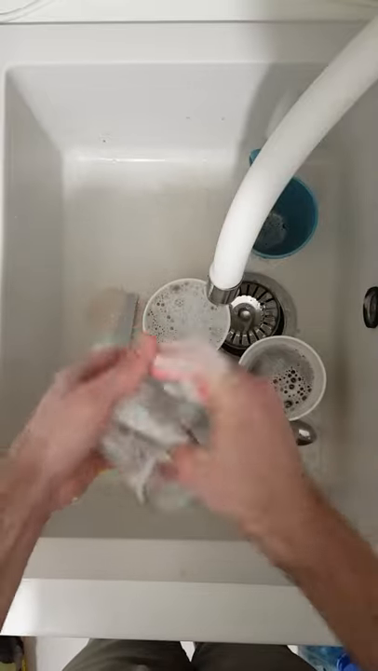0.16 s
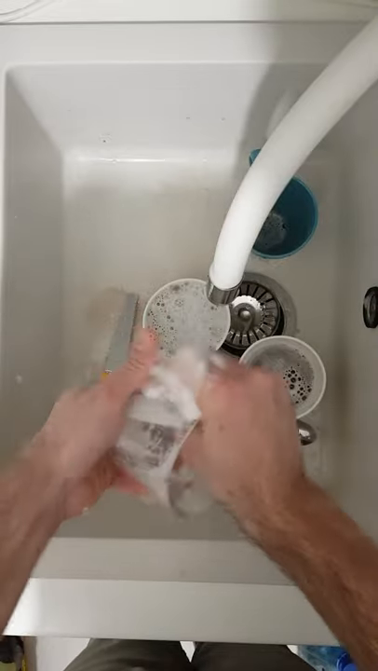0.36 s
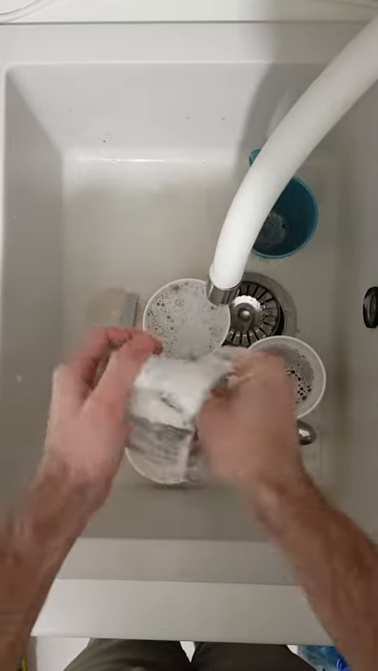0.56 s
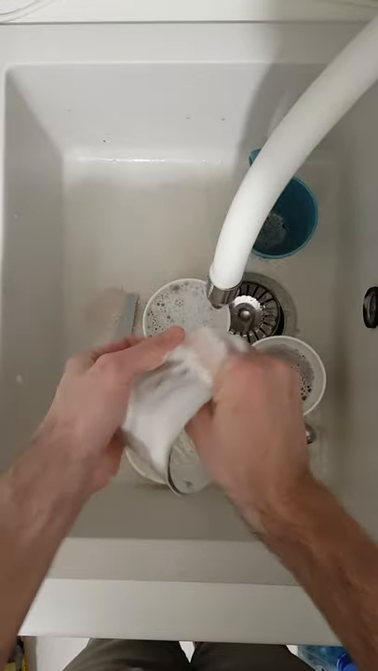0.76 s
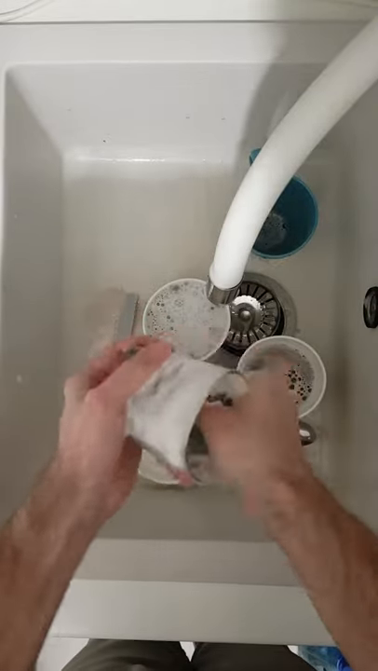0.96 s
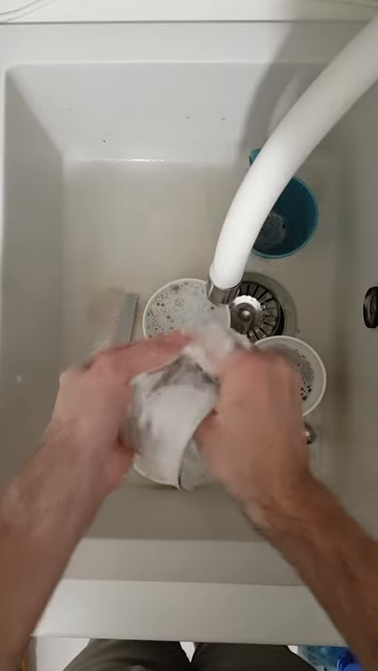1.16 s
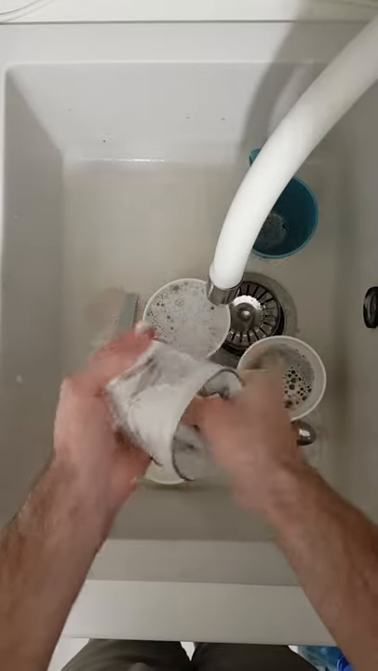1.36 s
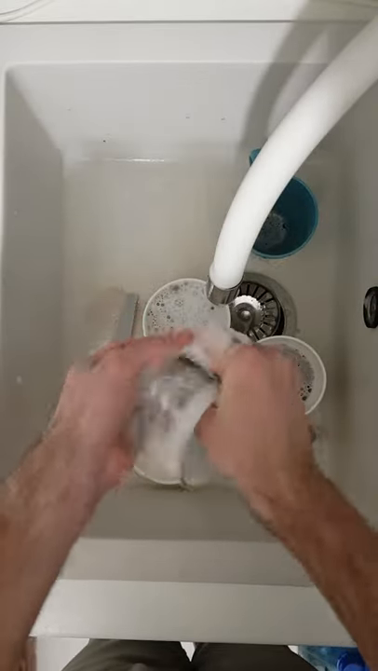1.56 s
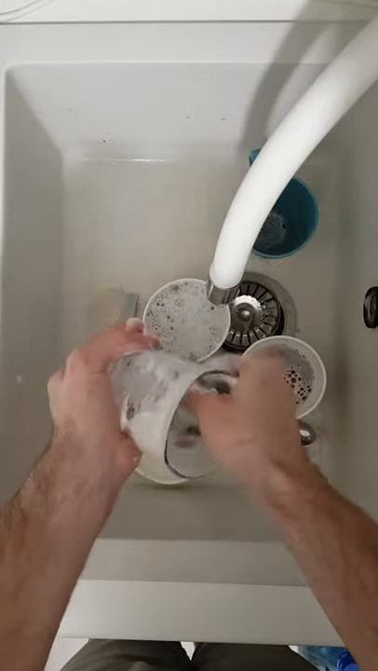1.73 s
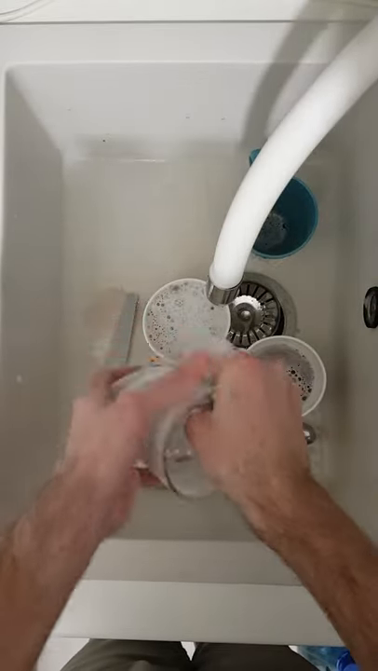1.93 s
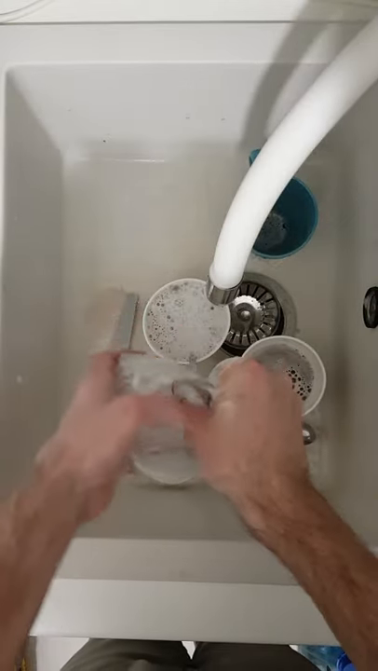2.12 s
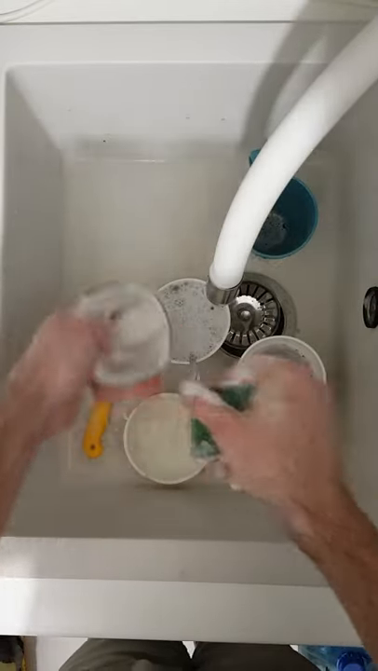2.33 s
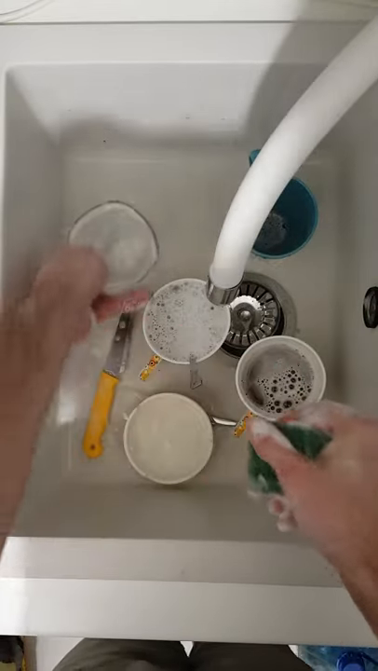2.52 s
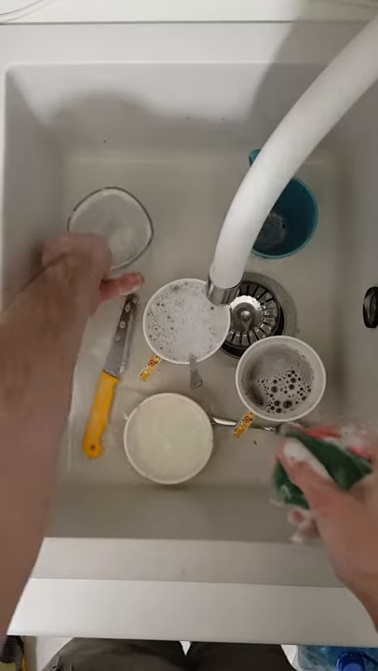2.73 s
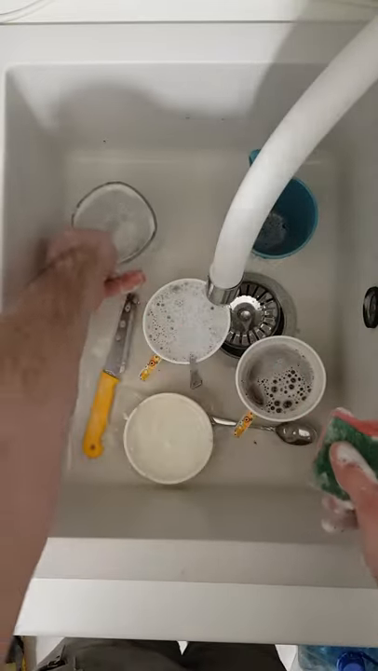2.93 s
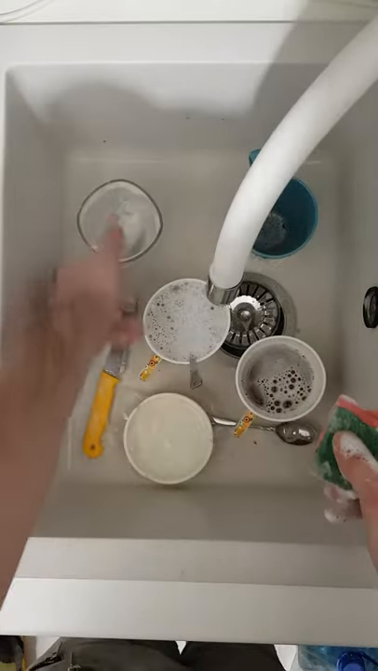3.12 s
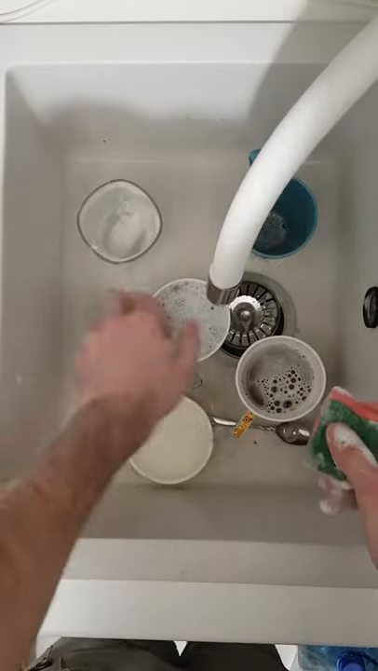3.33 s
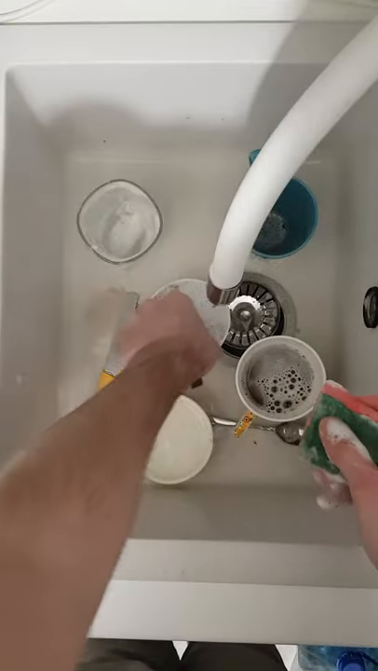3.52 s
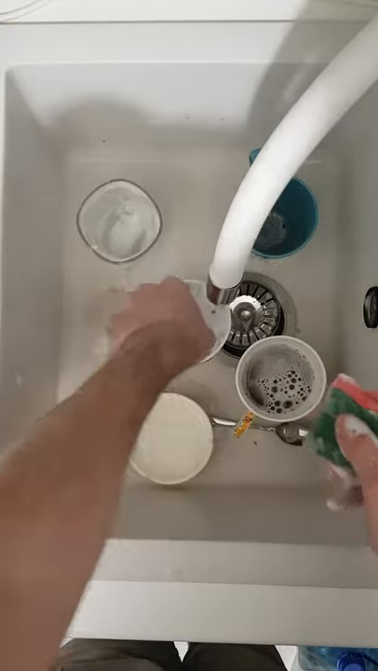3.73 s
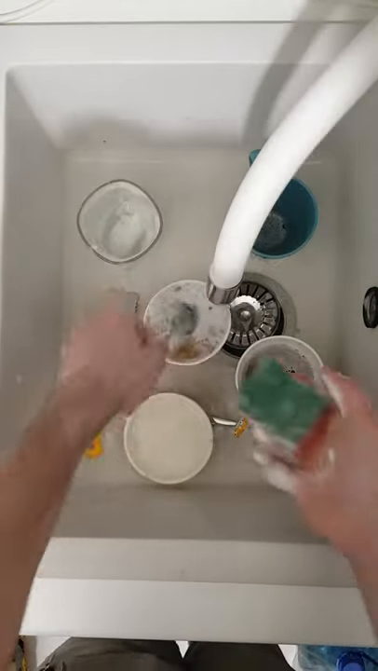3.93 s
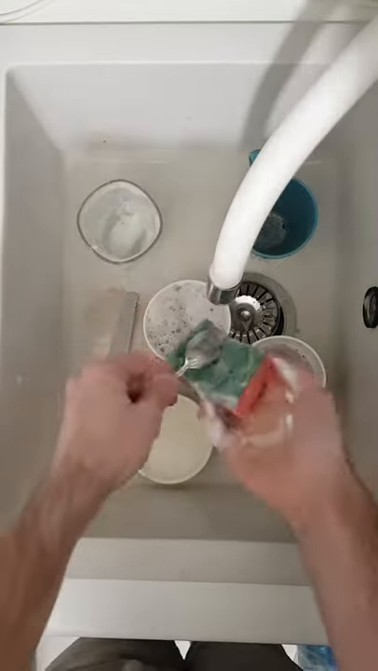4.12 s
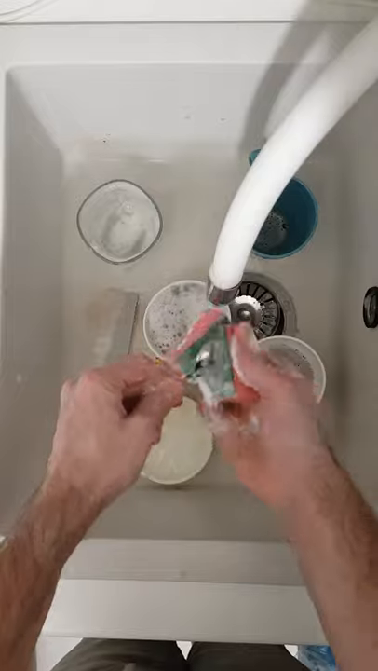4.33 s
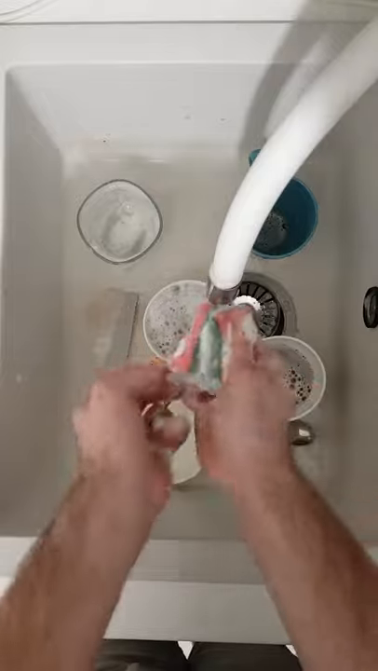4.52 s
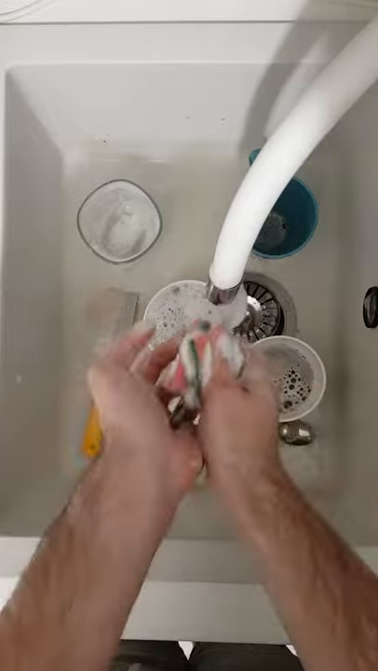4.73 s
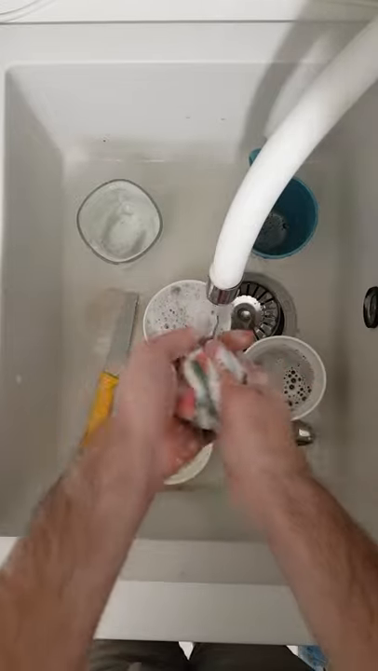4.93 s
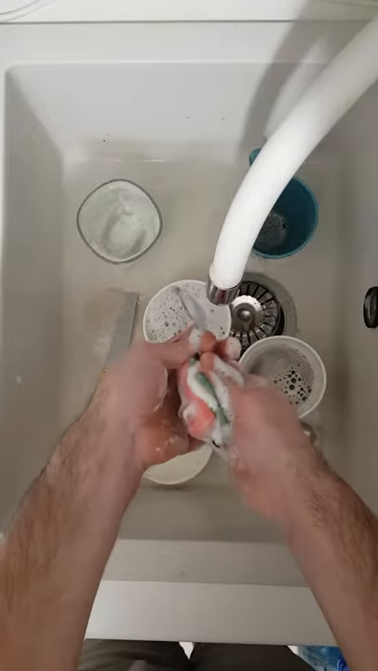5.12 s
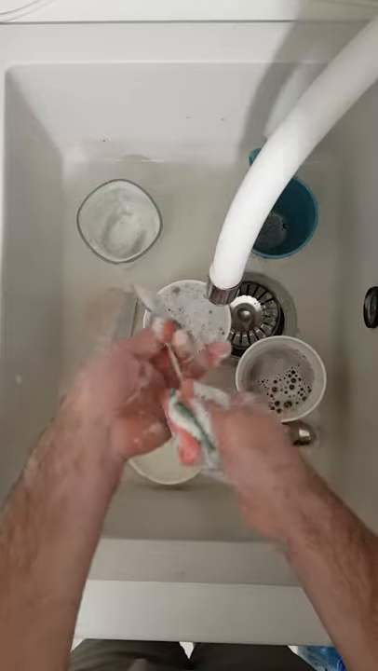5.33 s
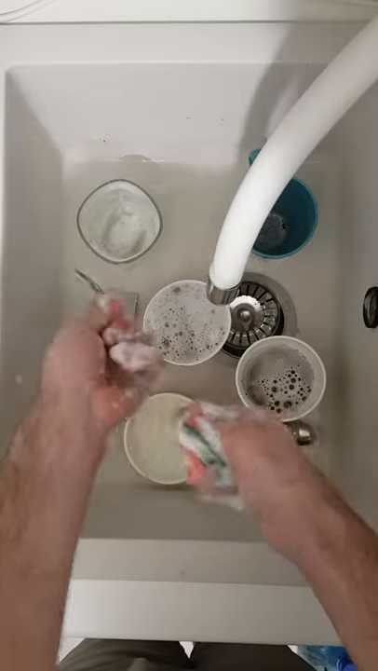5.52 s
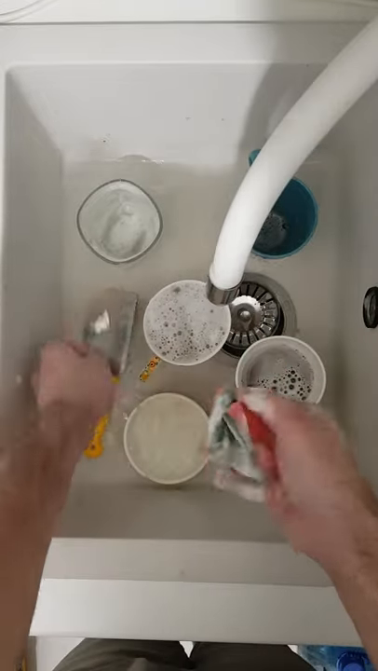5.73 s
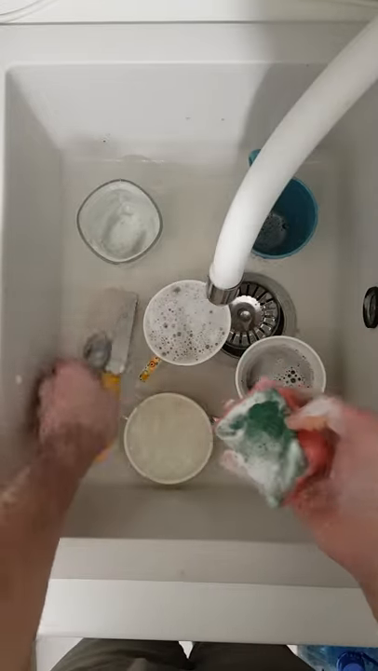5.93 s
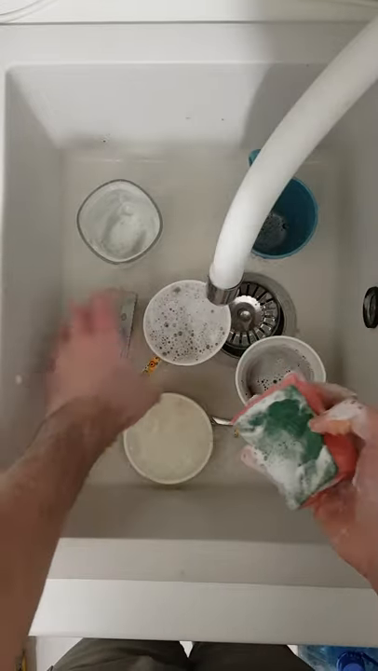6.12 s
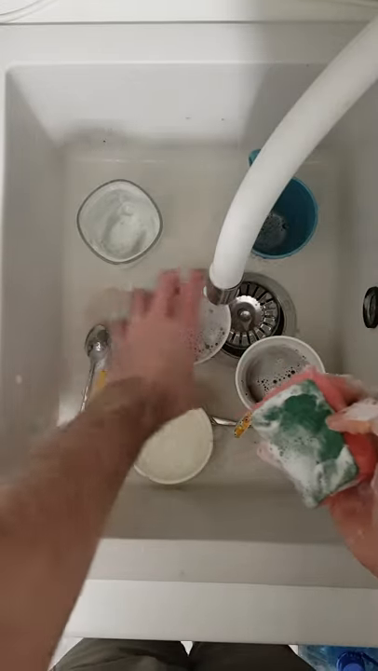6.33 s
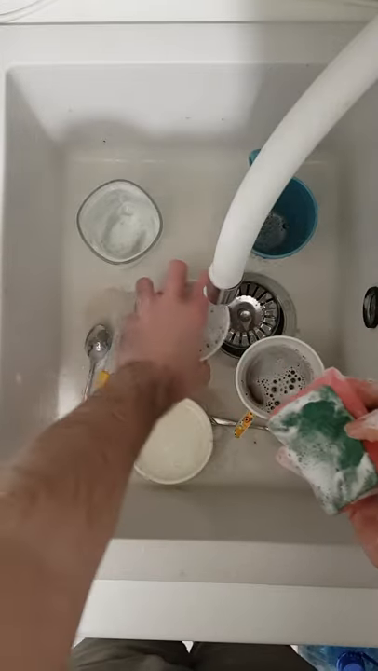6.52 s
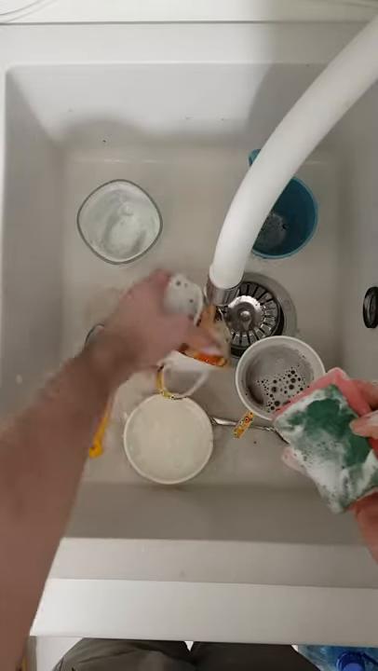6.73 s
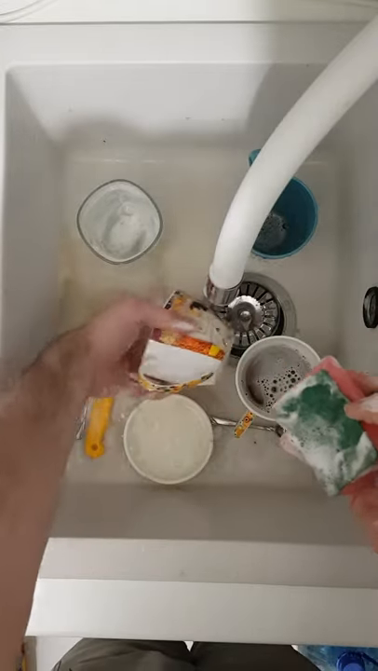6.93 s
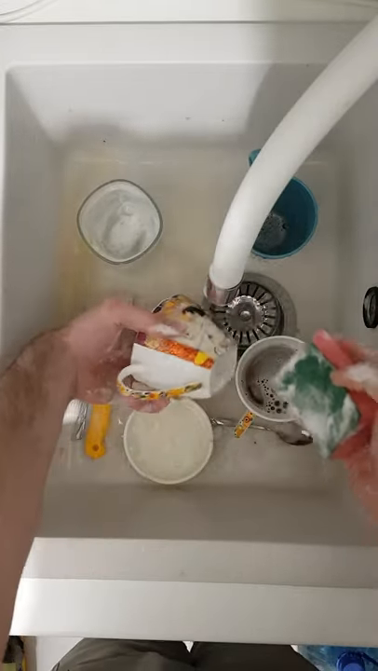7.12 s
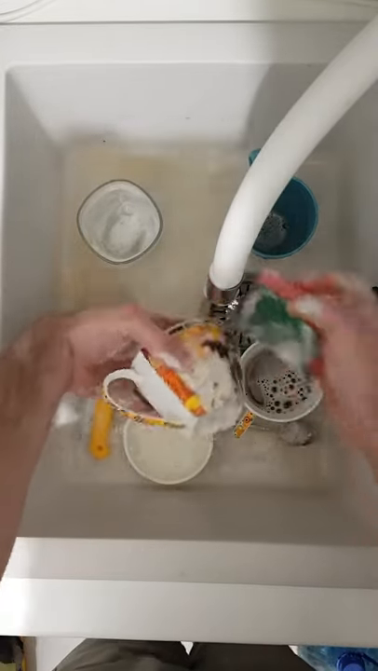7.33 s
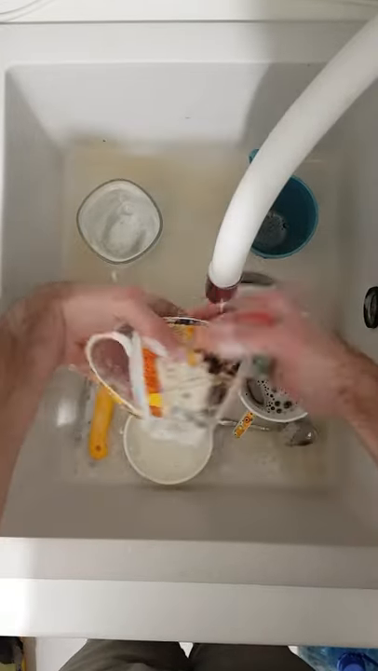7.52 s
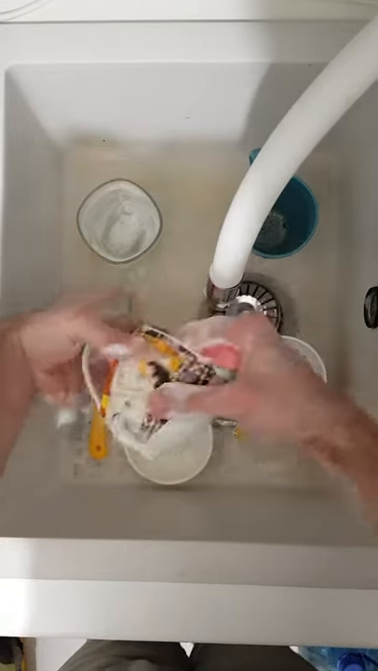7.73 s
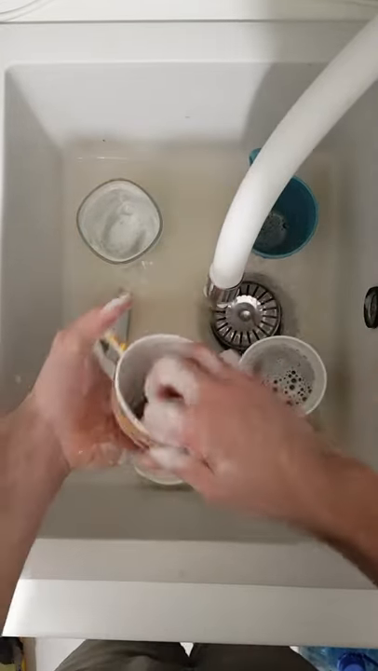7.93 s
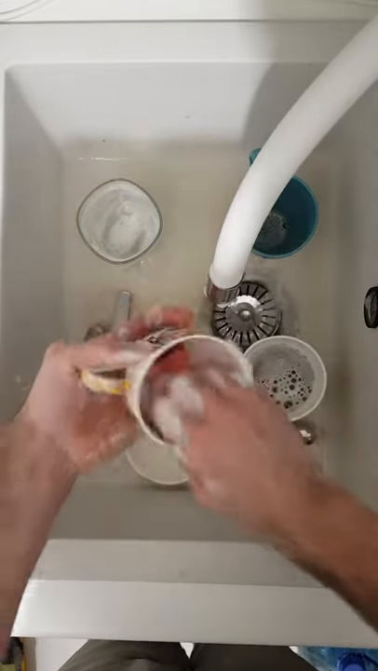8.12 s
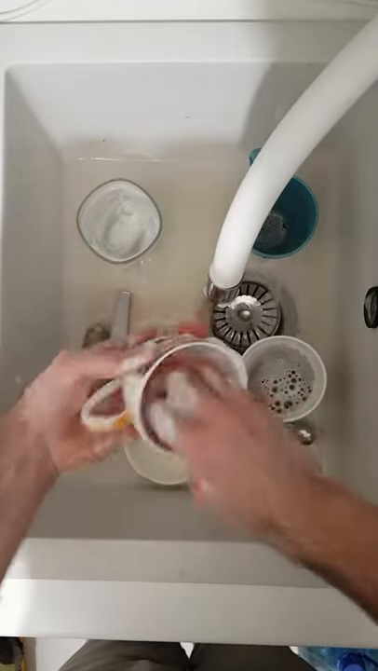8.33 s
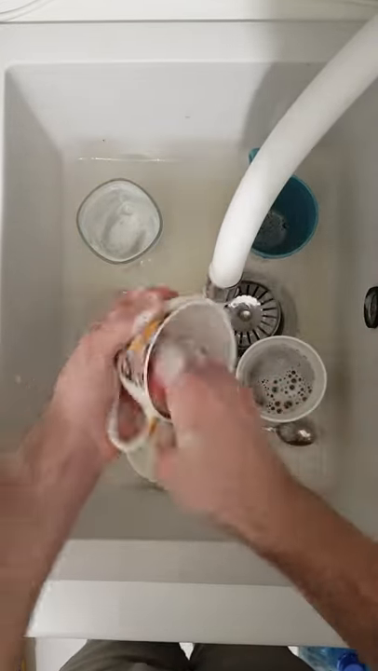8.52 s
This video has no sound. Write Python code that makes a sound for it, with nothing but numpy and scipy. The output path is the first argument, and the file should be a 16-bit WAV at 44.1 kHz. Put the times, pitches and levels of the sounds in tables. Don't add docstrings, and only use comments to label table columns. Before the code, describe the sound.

A soapy sponge squeaks and fizzes over a glass, the glass thuds into a sink, a spoon clatters, then a mug is emptied and wiped.

```python
import sys
import numpy as np
from scipy import signal
from scipy.fft import rfft, irfft, next_fast_len
from scipy.io import wavfile
from scipy.ndimage import uniform_filter1d

SR = 44100
rng = np.random.default_rng(int(sys.argv[2]) if len(sys.argv) > 2 else 0)


def wrap_up_sound(samples):
    columns = np.atleast_2d(samples).T
    tamed = np.clip(columns, -1, 1)
    steps = np.round(tamed * 32767).astype(np.int16)
    wavfile.write(sys.argv[1], SR, steps)


def gain_from_db(level_db):
    decades = np.asarray(level_db, float) / 20
    return 10 ** decades


N = 377496
STEP = 40

# (frequency [Hz], level [dB per Hz])
MUG_BURST = [(60, -47), (250, -29.5), (600, -4), (1200, 1.5), (2200, -12), (2700, -6.5), (6000, -29),
             (9000, -30.5), (16000, -38.5)]


def rms_one(x):
    return x / np.sqrt(np.mean(x ** 2) + 1e-20)


def at_hz(points, hz):
    table = np.array(points)
    return np.interp(np.log(np.maximum(hz, 1)), np.log(table[:, 0]), table[:, 1])


def over_time(points):
    return np.interp(np.arange(N) / SR, *np.transpose(points))


def every_sample(slow):
    between = np.arange(STEP) / STEP
    return (slow[:-1, None] + np.diff(slow)[:, None] * between).ravel()[:N]


def colour(x, spectrum):
    size = next_fast_len(N)
    hz = np.fft.rfftfreq(size, 1 / SR)
    inside = (hz > spectrum[0][0]) & (hz < spectrum[-1][0])
    return irfft(rfft(x, size) * gain_from_db(at_hz(spectrum, hz)) * inside, size)[:, :N]


def drift(rate_hz):
    r = np.exp(-2 * STEP * np.pi * rate_hz / SR)
    white = rng.standard_normal(N // STEP + 2002)
    return rms_one(signal.lfilter([1], [1, -2 * r, r * r], white)[2000:])


def ring(force, hz, t60):
    r = gain_from_db(-60 / (t60 * SR))
    w = 2 * np.pi * hz / SR
    return signal.lfilter([0, np.sin(w)], [1, -2 * r * np.cos(w), r * r], force + 1e-18)


def grains(per_s, uneven_db, clump_db):
    sizes = gain_from_db(uneven_db * np.minimum(rng.exponential(1, (2, N)), 5))
    sizes = sizes * np.sign(rng.random((2, N)) - .5)
    chance = per_s * every_sample(gain_from_db(clump_db * drift(25))) / SR
    return sizes * (rng.random((2, N)) < chance)


def pockets(clicks, low_hz, high_hz, cycles, centre_hz, octaves, wander_db, count):
    dealt = rng.integers(0, count, N)
    sizes = np.geomspace(low_hz, high_hz, count)
    gains = []
    for hz in sizes:
        off_centre = np.log2(hz / centre_hz) / octaves
        gains.append(gain_from_db(wander_db * drift(9.0) - 5.1 * off_centre ** 2) + 0.027)
    gains = np.array(gains)
    gains /= np.sqrt(np.sum(gains ** 2, axis=0))
    out = 0
    for k, hz in enumerate(sizes):
        out = out + every_sample(gains[k]) * rms_one(ring(clicks * (dealt == k), hz, cycles / hz))
    return signal.sosfilt(signal.butter(2, 1.076 * low_hz, "high", fs=SR, output="sos"), out)


def gestures(s, rise_s, fall_s, db):
    t = np.arange(N // STEP + 2) * STEP / SR - s[:, None]
    swell = np.maximum(-t, 0) / np.abs(rise_s)[:, None]
    fade = np.maximum(t, 0) / np.abs(fall_s)[:, None]
    return gain_from_db(2 * (db[:, None] - 10 * swell ** 1.7 - 10 * fade ** 1.19)) + 1e-17


def kitchen_floor():
    # (frequency [Hz], level [dB per Hz])
    floor_colour = [(15, -54), (25, -17.5), (76, -6), (180, -21), (270, -12), (350, -14.5), (480, -8.5),
                    (936, -30.5), (1560, -9.5), (2910, -35), (4740, -29.5), (16000, -11)]
    return gain_from_db(-73) * rms_one(colour(rng.standard_normal((2, N)), floor_colour))


def foam_fizz():
    # (frequency [Hz], level [dB per Hz])
    fizz_colour = [(1470, -14), (2500, -4), (2790, -9), (3040, -4.5), (7300, -9), (8080, -13),
                   (11800, -11.5), (15200, -22.5), (16000, -18.5)]
    flicker = every_sample(gain_from_db(1.2 * drift(30)))
    return flicker * rms_one(colour(grains(per_s=9000, uneven_db=0.0, clump_db=3.0), fizz_colour))


def sponge_squelch():
    # (time [s], frequency [Hz])
    favoured = [(0, 1630), (.7, 1630), (2.0, 1764), (4.3, 1465), (5.3, 1840), (5.8, 1700), (6.9, 1400),
                (7.1, 2130), (7.5, 1740), (8.099, 1390), (8.56, 1190)]
    centre_hz = np.interp(np.arange(N // STEP + 2) * STEP / SR, *np.transpose(favoured))
    clicks = grains(per_s=5000, uneven_db=-2.0, clump_db=3.0)
    return pockets(clicks, low_hz=943, high_hz=3060, cycles=22.0, centre_hz=centre_hz,
                   octaves=0.51, wander_db=3.0, count=11)


def dish_hollow(centre_hz):
    clicks = grains(per_s=1800, uneven_db=2.0, clump_db=2.5)
    return pockets(clicks, low_hz=242, high_hz=900, cycles=21.0, centre_hz=centre_hz,
                   octaves=0.24, wander_db=4.0, count=12)


def body_rumble():
    # (frequency [Hz], level [dB per Hz])
    rumble_colour = [(12, -44), (20, -7), (34, -5), (54, 3.5), (113, -1.5), (189, -23), (265, -11),
                     (300, -19), (390, -39), (660, -120)]
    return rms_one(colour(rng.standard_normal((2, N)), rumble_colour))


def handling():
    # (time [s], rise [s], fall [s], foam level [dB], squelch above foam [dB])
    glass_strokes = [(.05, 0.089, 0.66, -66, -2), (.16, .016, 0.068, -48.5, -0.5),
                     (.215, 0.052, 0.068, -50, -2), (.29, 0.022, 0.16, -48.5, 0.5),
                     (.539, 0.11, 0.034, -48.5, 2), (.632, 0.048, 0.056, -53, 4),
                     (.754, 0.067, 0.21, -65, -5), (.85, 0.072, 0.079, -52.5, 0.5),
                     (.93, 0.031, 0.086, -48, 6), (1.155, 0.13, 0.3, -61, -2),
                     (1.27, 0.075, 0.041, -54.5, -1), (1.375, 0.1, 0.046, -48.5, 1),
                     (1.511, 0.059, 0.043, -54, 1), (1.64, 0.066, 0.087, -53.5, -7),
                     (1.715, 0.073, 0.061, -55.5, 3), (1.839, 0.036, 0.084, -59, -2.5),
                     (2.1, 0.098, 0.28, -68.5, 9), (2.341, 0.26, 0.043, -60, -5.5),
                     (2.735, 0.22, 0.12, -64, 3), (2.86, 0.027, 0.016, -62.5, -7)]
    spoon_strokes = [(3.576, 0.02, 0.073, -61.5, 17.5), (3.76, 0.05, 0.094, -68, -4),
                     (4.2, 0.05, 0.22, -60.5, -19.5), (4.326, 0.048, 0.23, -56, -7),
                     (4.416, 0.067, 0.064, -45.5, 7.5), (4.652, 0.08, 0.32, -65.5, 14),
                     (4.814, 0.8, 0.077, -59, 12.5), (5.1, 0.098, 0.11, -79, 16),
                     (5.27, 0.058, 0.14, -68, 20), (5.349, 0.063, 0.074, -62.5, 16.5),
                     (5.484, 0.051, 0.05, -52.5, 10.5), (5.662, 0.078, 0.12, -56, 1.5),
                     (5.96, 0.16, 0.028, -62, -4.5), (6.3, 0.087, 0.06, -64.5, -2),
                     (6.58, 0.054, 0.036, -66, 20)]
    mug_strokes = [(6.815, 0.0034, 0.26, -52.5, -24), (6.91, 0.061, 0.082, -47, 3),
                   (7.086, 0.1, 0.23, -46.5, -3), (7.172, 0.15, 0.063, -46.5, 5),
                   (7.34, 0.15, 0.061, -51.5, -11), (7.486, 0.043, 0.19, -53.5, 3),
                   (7.726, 0.073, 0.049, -52.5, 6), (7.92, 0.21, 0.13, -62, 2),
                   (8.056, 0.0089, 0.38, -54.5, 4.5), (8.18, 0.18, 0.28, -61, 17),
                   (8.51, 0.13, .1, -58.5, 11), (8.54, 0.035, .1, -57.5, 21)]
    # (frequency [Hz], level above the squelch [dB])
    glass_hollow = (800, -13)
    spoon_hollow = (910, -16)
    mug_hollow = (820, -15)
    # (time [s], fall [s], rumble level [dB], hollow level [dB], hollow frequency
    # [Hz])
    shove_list = [(.01, 0.12, -76.5, -72, 770), (.2, 0.072, -62, -59, 685), (.3, 0.19, -75, -58.5, 800),
                  (0.527, .04, -46, -46, 780), (0.577, .035, -57, -52.5, 267),
                  (.678, 0.13, -59.5, -94, 587), (.96, .05, -59, -48, 626),
                  (1.166, 0.06, -61, -68.5, 252), (1.348, 0.032, -83, -56, 900),
                  (1.8, 0.035, -87, -64.5, 800), (2.595, 0.1, -62.5, -73.5, 440),
                  (2.879, .05, -45, -79, 400), (3.219, 0.14, -59.5, -85.5, 510),
                  (3.521, 0.03, -44.5, -52, 250), (3.585, .06, -48, -43.5, 390),
                  (3.73, .05, -69, -72.5, 570), (3.907, 0.046, -70, -76.5, 317),
                  (4.239, 0.035, -56.5, -65, 296), (4.417, 0.067, -94.5, -51, 698),
                  (4.598, 0.11, -78.5, -62.5, 830), (5.0, 0.063, -69, -88, 400),
                   (5.483, 0.035, -72, -56.5, 800), (5.56, 0.1, -57, -83, 292),
                   (5.85, 0.064, -62, -68.5, 270), (5.996, 0.035, -58, -40, 254),
                   (6.51, 0.058, -66, -63, 323), (6.58, 0.047, -71.5, -46.5, 265),
                   (6.908, 0.0365, -58, -45, 492), (7.176, 0.049, -85, -50.5, 595),
                   (7.4, 0.13, -65.5, -80, 300), (7.54, 0.051, -52, -52.5, 248),
                   (7.61, 0.14, -53.5, -67, 610), (7.727, 0.037, -64.5, -45.5, 745),
                   (8.071, 0.067, -81, -50, 810), (8.219, 0.21, -87, -57, 700), (8.42, 0.07, -58, -54, 700),
                   (8.547, 0.016, -49, -36, 860)]
    basin_hz, basin_t60_s, basin_db = 270, .12, -6.5
    squelch_span = 0.73

    strokes = [row + glass_hollow for row in glass_strokes]
    strokes += [row + spoon_hollow for row in spoon_strokes]
    strokes += [row + mug_hollow for row in mug_strokes]
    s, rise, fall, foam_db, wet_db, dish_hz, dish_db = np.transpose(strokes)
    foam = gestures(s, rise, fall, foam_db)
    wet = gestures(s, squelch_span * rise, squelch_span * fall, foam_db + wet_db)

    at, fade, rumble_db, boom_db, boom_hz = np.transpose(shove_list)
    shoves = gestures(at, .4 * fade, fade, boom_db)
    hums = shoves * (basin_hz / boom_hz)[:, None] ** 2
    rumbles = shoves * gain_from_db(2 * (rumble_db - boom_db))[:, None]

    booms = np.concatenate([wet * gain_from_db(2 * dish_db)[:, None], shoves])
    weight = booms ** 10
    log_hz = np.log(np.concatenate([dish_hz, boom_hz]))
    hollow_hz = np.exp(log_hz @ weight / np.sum(weight, axis=0))

    powers = foam, wet, booms, hums, rumbles
    gains = [every_sample(np.sqrt(power.sum(axis=0))) for power in powers]
    fizz_gain, squelch_gain, hollow_gain, hum_gain, rumble_gain = gains
    out = fizz_gain * foam_fizz()
    out = out + squelch_gain * sponge_squelch()
    out = out + hollow_gain * dish_hollow(hollow_hz)
    out = out + (rumble_gain + gain_from_db(-76)) * body_rumble()
    basin = rms_one(ring(rng.standard_normal((2, N)), basin_hz, basin_t60_s))
    return out + hum_gain * gain_from_db(basin_db) * basin


def dying_bands(span):
    # (frequency [Hz], t60 [s])
    basin_tail = [(60, 0.14), (250, 0.18), (1000, 0.086), (3000, 0.17), (12000, 0.13)]
    # (frequency [Hz], level [dB], t60 [s])
    kitchen_tail = [(60.8, -7.5, 0.28), (300, -18, 0.31), (924.6, -18.5, 0.38), (2000, -25.5, 0.55),
                    (5190, -30.5, 0.12), (13880, -31, .3)]
    t = np.arange(span) / SR
    edges = 45 * 2 ** np.arange(0, 8.6, .5)
    white = rng.standard_normal((2, 2, span))
    bands = []
    for k, (low, high) in enumerate(zip(edges, edges[1:])):
        hz = np.sqrt(low * high)
        early = gain_from_db(-60 * t / at_hz(basin_tail, hz))
        late_t60 = at_hz(np.array(kitchen_tail)[:, ::2], hz)
        late = gain_from_db(at_hz(kitchen_tail, hz) - 60 * t / late_t60)
        decay = (early + late) * (1 - np.exp(-t * hz / 2))
        band = signal.butter(2, [low, high], "band", fs=SR, output="sos")
        bands.append((hz, decay, signal.sosfilt(band, white[k % 2])))
    return bands


def softness(dull_db, hz):
    return -dull_db * np.log2(max(hz, 300) / 1000)


def knocks(hits, modes, spectrum, ring_db, burst_db, split, rattle_s, last_s):
    out = np.zeros((2, N + SR))
    span = int(last_s * SR)
    t = np.arange(span) / SR
    bands = dying_bands(span)
    cuts = [signal.butter(2, 0.76 * hz, "high", fs=SR) for hz, _, _ in modes]
    for hit, (s, db, dull_db) in enumerate(hits):
        force = rng.standard_normal((2, span)) * np.exp(-t / rattle_s)
        force /= np.sqrt(np.sum(force[0] ** 2))
        force[:, 0] += .9
        blow = np.zeros((2, span))
        for hz, decay, noise in bands:
            level = gain_from_db(burst_db + at_hz(spectrum, hz) + softness(dull_db, hz))
            blow += level * decay * np.roll(noise, 3777 * hit, axis=1)
        chance_db = rng.normal(0, 1.8, len(modes))
        for (hz, mode_db, t60), c, cut in zip(modes, chance_db, cuts):
            heard = force[:, :int((t60 + 7 * rattle_s) * SR)]
            pair = ring(heard, hz, t60) + 0.14 * ring(heard[::-1], hz * (1 + split), 1.1 * t60)
            pair *= np.sqrt(.13 * t60 * SR / np.sum(pair ** 2, axis=1, keepdims=True))
            level = gain_from_db(ring_db + mode_db + c + softness(dull_db, hz))
            blow[:, :pair.shape[1]] += level * signal.lfilter(*cut, pair)
        start = round(s * SR)
        out[:, start:start + span] += gain_from_db(db) * blow
    return out[:, :N]


def glass_set_down():
    # (time [s], peak level [dB], dullness [dB per octave]); later small ones are hand bumps on the cups
    touch_hits = [(2.868, -4, 1), (3.016, -39.5, 16), (3.509, -56.5, 15), (3.562, -37.5, 6.5),
                  (3.628, -44.5, 10.5), (3.891, -67, 11)]
    settle_hits = [(3.043, -1.5, 2.5)]
    rim_hits = [(2.868, 5.5, 12.5), (3.043, -2, 4.5)]
    # (frequency [Hz], level [dB], t60 [s])
    sink_modes = [(262, -8, 0.1), (346, -10.5, 0.11), (543, -15, 0.11), (800, -6, .09), (894.5, 5, 0.078),
                  (1034, -9, .1), (1164, -11, .09), (1267, -6, .1), (1430, -16, .1), (1597, -10.5, .1),
                  (1700, -13.5, 0.11), (2280, -12, .09), (2627, -6, 0.098)]
    damped_sink_modes = [(270, -11.5, 0.059), (332, -12, .09), (470, -15.5, 0.14), (810, -9, 0.12),
                         (895, 0.5, 0.092), (1031.4, -6.5, 0.074), (1180, -10, 0.14), (1259, -1, 0.083),
                         (1367, -11, .1), (1749, -5, 0.082), (1900, -6, 0.099), (2180, -13.5, .12),
                         (2300, -16, .1), (2775, -20, 0.097)]
    rim_modes = [(1823, -18, .64), (1930, -15.5, .52)]
    # (frequency [Hz], level [dB per Hz])
    thud_burst = [(24, -51), (45, -5.5), (160, -25.5), (269, -16), (600, -14.5), (896, -11.5),
                  (1040, -14.5), (1270, 5), (2570, -11), (3140, -40), (16000, -67)]
    touch = knocks(touch_hits, sink_modes, thud_burst, ring_db=-11.0, burst_db=6.0,
                   split=0.024, rattle_s=0.023, last_s=.55)
    settle = knocks(settle_hits, damped_sink_modes, thud_burst, ring_db=-12.5, burst_db=5.5,
                    split=0.024, rattle_s=0.024, last_s=.55)
    rim = knocks(rim_hits, rim_modes, thud_burst, ring_db=-12.5, burst_db=-40.0,
                 split=0.002, rattle_s=0.006, last_s=.75)
    return touch + settle + rim


def drops():
    # (time [s], peak level [dB], pitch [Hz], t60 [s], splash level [dB])
    drop_list = [(3.738, -50, 593, 0.074, -18), (4.243, -33, 1980, 0.075, -14.5),
                 (4.912, -68.5, 1425, 0.059, 36), (6.814, -39, 1220, 0.087, 11.5),
                 (6.847, -33, 3650, 0.052, 14.5), (6.849, -39, 5700, .05, -10),
                 (6.893, -23, 1137, 0.11, -16), (6.896, -26, 2810, 0.058, -12), (6.93, -37, 4300, .07, -5),
                 (6.932, -38, 5800, .05, -10), (6.98, -33, 2300, .06, -10), (7.002, -33, 1290, 0.071, -8),
                 (7.026, -26, 1750, .08, -5), (7.075, -36, 1400, .07, -10), (7.086, -26.5, 3570, 0.045, -1),
                 (7.101, -14, 2310, 0.11, -13), (7.11, -38, 519, 0.18, -15), (7.159, -32, 522, 0.18, 4),
                 (7.161, -33, 900, 0.17, -15), (7.222, -21.5, 1666, 0.12, 0),
                 (7.229, -35.5, 7150, 0.044, 5), (7.274, -31, 1615, 0.14, -15), (7.3, -43, 4000, 0.046, -5),
                 (7.319, -35, 1630, 0.15, 11), (7.37, -38, 4090, 0.047, 18), (7.714, -35, 1018, 0.2, -12),
                 (7.928, -52.5, 7100, 0.043, 24.5), (8.022, -40.5, 2200, 0.1, -18),
                 (8.07, -41, 846, 0.12, -12), (8.272, -48, 7500, .05, 11), (8.412, -43, 7800, 0.055, 11)]
    out = np.zeros((2, N + SR))
    t = np.arange(int(.25 * SR)) / SR
    for s, db, hz, t60, splash_db in drop_list:
        white = rng.standard_normal((2, len(t) + 1))
        flutter = 1 + 0.44 * rms_one(uniform_filter1d(white[:, 1:], size=130))
        rising = np.sin(2 * np.pi * hz * t * (1 + 0.15 * t))
        bubble = rising * gain_from_db(-60 * t / t60) * (1 - np.exp(-t / 0.00071))
        splash = (white[:, 1:] - 1.37 * white[:, :-1]) * np.exp(-t / 0.017)
        start = round(s * SR)
        drop = bubble * flutter + gain_from_db(splash_db) * 0.1 * splash
        out[:, start:start + len(t)] += gain_from_db(db - 5.0) * drop
    return signal.lfilter(*signal.butter(2, 450, "high", fs=SR), out[:, :N] + 1e-18)


def spoon_on_knife():
    # (time [s], peak level [dB], dullness [dB per octave])
    spoon_hits = [(5.979, -22.5, 7), (6.02, -22, 2), (6.074, -3, 0.94), (6.097, -9.5, 0.6),
                  (6.153, -15, 0.9), (6.174, -18, 3.5)]
    # (frequency [Hz], level [dB], t60 [s])
    cutlery_modes = [(1157, -4, 0.14), (2552, -10.5, 0.23), (4510, -4.5, .12), (5954, -8.5, 0.15),
                     (7830, -11.5, 0.16), (9130, -10.5, .08), (10380, -11, 0.15), (10520, -13.5, .1),
                     (12370, -6, 0.07), (14050, -5.5, .06), (15640, -12, .07),
                     (1584, -1.5, 0.097), (3420, -14.5, 0.12), (3640, -15.5, .06), (5630, -9, .035),
                   (6905, 1, .03), (7500, -1.5, 0.031), (9800, -17, .08), (11920, -17.5, 0.071),
                   (15040, -11.5, .06)]
    # (frequency [Hz], level [dB per Hz])
    clatter_burst = [(24, -42.5), (80, 3), (220, -10), (680, -10.5), (1150, 3.5), (2980, -7), (4570, -4.5),
                     (12100, -12), (13100, -21.5), (14500, -17), (16000, -22)]
    return knocks(spoon_hits, cutlery_modes, clatter_burst, ring_db=-14.0, burst_db=-3.0,
                  split=0.015, rattle_s=0.0088, last_s=.32)


def mug_lifted():
    # (time [s], peak level [dB], dullness [dB per octave])
    lift_hits = [
        (6.523, -35, 3),
        (6.568, -34.5, 5),
    ]
    # (frequency [Hz], level [dB], t60 [s])
    full_modes = [(1490, 12, .13), (2150, -4, .06), (2900, -6, .06), (258, -3, .08), (440, -8, .1),
                  (904, -4, .12), (1130, -8, .1)]
    return knocks(lift_hits, full_modes, MUG_BURST, ring_db=-9.0, burst_db=7.5,
                  split=0.024, rattle_s=0.017, last_s=.25)


def pour():
    # (time [s], bubble level [dB])
    pour_level = [(6.8, -85.5), (6.83, -53), (6.95, -47), (7.05, -50), (7.129, -42), (7.25, -48.5),
                  (7.38, -67), (7.42, -86)]
    clicks = grains(per_s=1400, uneven_db=2.5, clump_db=3.0)
    bubbles = pockets(clicks, low_hz=1010, high_hz=7300, cycles=16.0, centre_hz=2600,
                      octaves=0.87, wander_db=5.5, count=7)
    return gain_from_db(over_time(pour_level)) * bubbles


def mug_knocked():
    # (time [s], peak level [dB], dullness [dB per octave])
    mug_hits = [(8.185, -30, -1.7), (8.213, -30, 0.5), (8.392, -38.5, -2), (8.548, -15, -2.5)]
    # (frequency [Hz], level [dB], t60 [s])
    mug_modes = [(643, -4, .07), (896, -2, 0.074), (1227, 9, 0.079), (1500, -9, 0.12), (1950, -8, 0.13),
                 (2640, 0, .07), (3070, -5.5, .05), (3914, -7, .04), (4520, -3, .04), (5980, -22.5, 0.031)]
    return knocks(mug_hits, mug_modes, MUG_BURST, ring_db=-13.0, burst_db=9.0,
                  split=0.043, rattle_s=0.0045, last_s=0.23)


def ports(pair, pan_db):
    # (frequency [Hz], likeness [0 to 1])
    likeness = [(60, .97), (250, .93), (700, .9), (950, .82), (1350, .42), (5000, .18), (15000, .3)]
    lag_s = 0.00015
    size = next_fast_len(N + 2000)
    hz = np.fft.rfftfreq(size, 1 / SR)
    alike = np.clip(at_hz(likeness, hz), 0, 1)
    turn = np.exp(1j * np.pi * hz * lag_s)
    shared, own = rfft(pair, size) * np.sqrt([(1 + alike) / 2, (1 - alike) / 2])
    left, right = irfft([(shared + 1j * own) * turn, (shared - 1j * own) / turn], size)[:, :N]
    return np.array([left * gain_from_db(pan_db / 2), right * gain_from_db(-pan_db / 2)])


def scene():
    # (time [s], left above right [dB])
    hand_place = [(0, 3.3), (1, 2), (1.7, 2.5), (3.7, 0.9), (4.7, 0), (5.9, 2.2), (7.1, 0.4), (7.7, 3),
                  (8.56, 1.5)]
    middle = kitchen_floor() + handling() + glass_set_down() + drops()
    middle = middle + mug_lifted() + pour() + mug_knocked()
    return ports(middle, pan_db=over_time(hand_place)) + ports(spoon_on_knife(), pan_db=2.5)


def band_limit(x):
    return signal.sosfilt(signal.butter(12, 16560, fs=SR, output="sos"), x)


def record(dry):
    heard = signal.sosfilt(signal.butter(3, 36, "high", fs=SR, output="sos"), dry)
    rounded = 1.5 * np.tanh(heard / 1.5)
    mix = signal.sosfilt(signal.cheby2(12, 60, 16650, fs=SR, output="sos"), rounded)
    return band_limit(mix)


dry = scene()
out = record(dry)
wrap_up_sound(out)
```